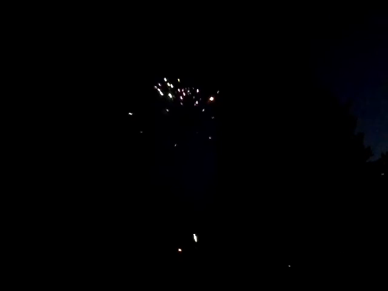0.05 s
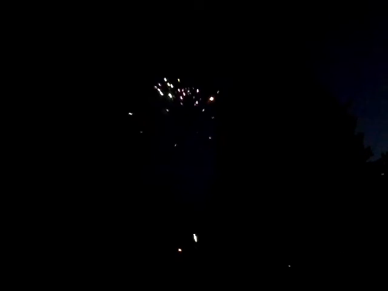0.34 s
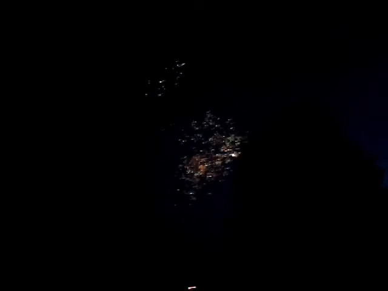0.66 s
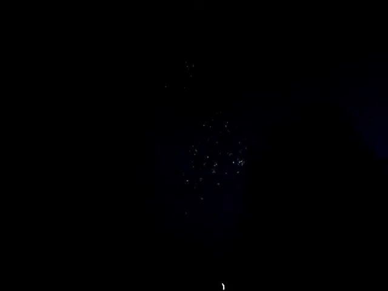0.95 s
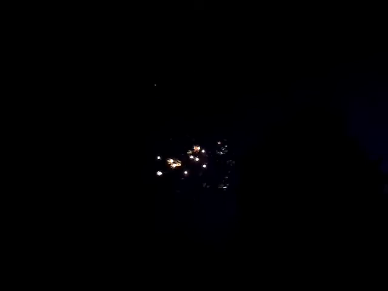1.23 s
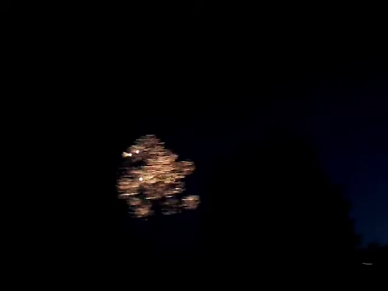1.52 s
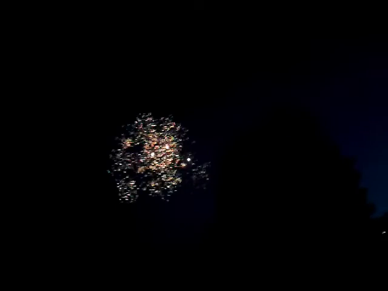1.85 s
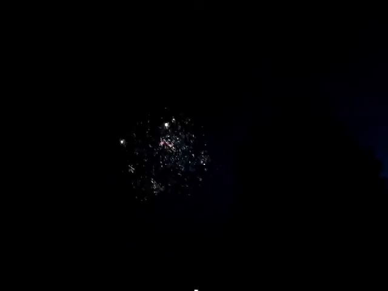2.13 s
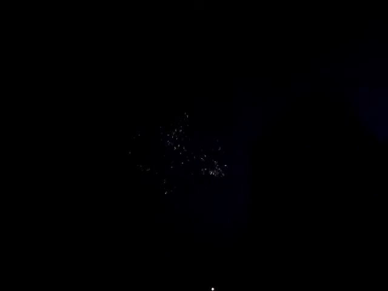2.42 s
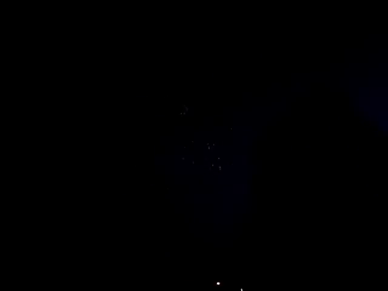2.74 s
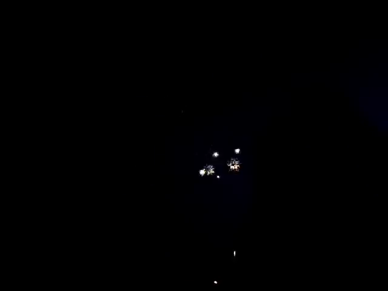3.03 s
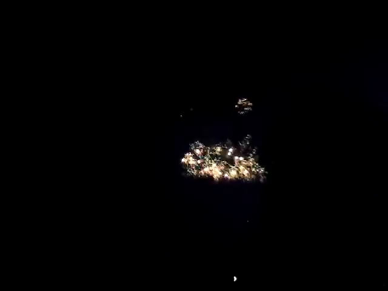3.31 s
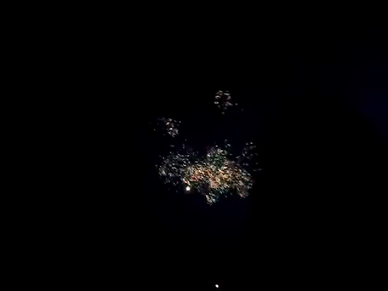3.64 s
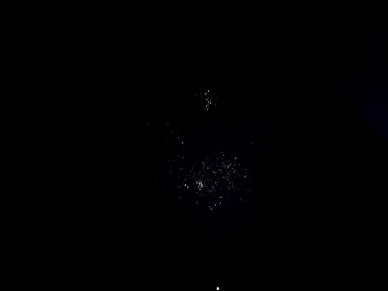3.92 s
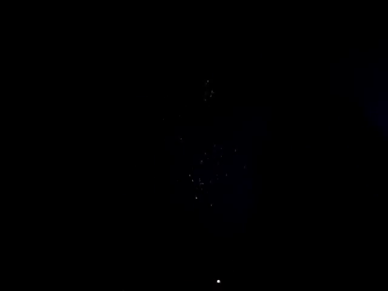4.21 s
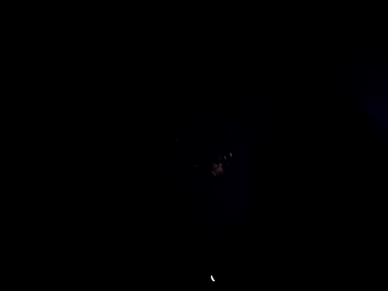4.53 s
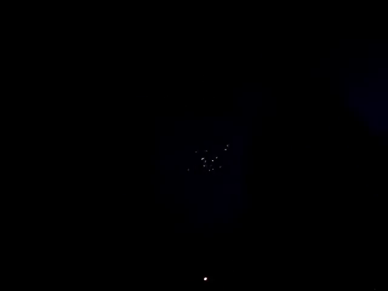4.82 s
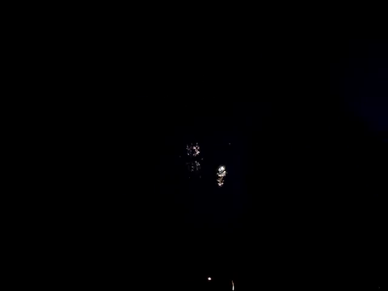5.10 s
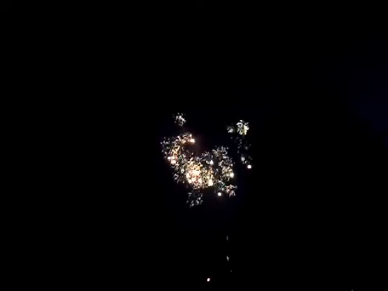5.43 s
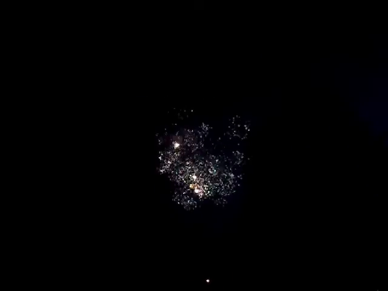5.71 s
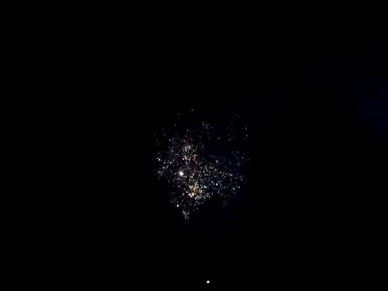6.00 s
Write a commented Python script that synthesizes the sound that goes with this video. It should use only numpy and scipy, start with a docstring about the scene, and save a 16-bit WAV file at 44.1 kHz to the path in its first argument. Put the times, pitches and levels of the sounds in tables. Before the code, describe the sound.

Three aerial fireworks bang and echo outdoors at night, amid swelling clouds of crackling sparks, sharp pops and dull launch thumps.

```python
"""Three firework shells bang outdoors at night, over mortar thumps and clouds of crackling stars.
Each report is a short pressure wave. The shells overload the microphone, bounce off the ground,
slap back from the surroundings and roll away. Stars burn as swelling, fading clouds of tiny blasts,
with louder single pops on top. Low rumble and faint hiss lie underneath, a few close knocks open
the scene, and the sound cuts out twice, with two thin clicks."""
import sys
import numpy as np
from scipy import signal
from scipy.fft import rfft
from scipy.io import wavfile
from scipy.ndimage import uniform_filter1d

SR = 44100
rng = np.random.default_rng(int(sys.argv[2]) if len(sys.argv) > 2 else 0)


def wav_out(sig):
    """Save sig, one row per channel (or a flat mono array), as 16-bit PCM at SR to the path in sys.argv[1]."""
    wavfile.write(sys.argv[1], SR, np.round(np.clip(np.atleast_2d(sig).T, -1, 1) * 32767).astype(np.int16))


N = 271435
TIME = np.arange(N) / SR

# shell bursts: start_s, drive_db (before overload), pitch_hz, crack_db (relative to the blast),
# slap_gain_db, slap_pitch_ratio
SHELLS = [(0.9934, 8, 655, -8, 4, 0.84), (2.7075, 3.5, 583, -25.5, -1.5, 0.55),
          (4.8998, 3, 630, -14.5, 6, 0.93)]
# gaps where the sound cuts out: start_s, end_s
GAPS = [(.3755, .736), (2.7555, 2.8725)]


def amp(db):
    """Decibels to gain."""
    return 10 ** (np.asarray(db) / 20)


def unit_rms(x):
    """Scales to rms 1."""
    return x / np.sqrt(np.mean(x ** 2) + 1e-20)


def levelled(x, size):
    """Rides the gain to a running rms of 1 over size samples."""
    power = uniform_filter1d(uniform_filter1d(x ** 2, size), size)
    return x / np.sqrt(abs(power) + 1e-20)


def curve_at(points, hz):
    """Reads a curve on a log-frequency axis."""
    point_hz, value = np.transpose(points)
    return np.interp(np.log(hz + 1), np.log(point_hz + 1), value)


def add(mix, start_s, sound):
    """Mixes a sound in at a time."""
    part = mix[max(round(start_s * SR), 0):][:len(sound)]
    part += sound[:len(part)]


def lowpass(x, hz, order):
    """Causal low-pass."""
    return signal.sosfilt(signal.butter(order, min(hz, .45 * SR), fs=SR, output="sos"), x)


def ring(x, hz, damping):
    """A heavily damped resonance of gain 1."""
    w = 2 * np.tan(np.pi * min(hz, .4 * SR) / SR)
    return signal.lfilter(*signal.bilinear([2 * damping * w, 0], [1, 2 * damping * w, w * w]), x)


def blast(hz, edge_hz, damping, order, size=4096):
    """A pressure wave of peak 1: one push and its rebound, rounded off by the air."""
    wave = lowpass(ring(signal.unit_impulse(size), hz, damping), edge_hz, order)
    return -wave / abs(wave).max()


def scatter(hz, edge_hz, decay_s, damping, order, size=4096):
    """A dying spray of small reflections."""
    spray = unit_rms(lowpass(ring(rng.standard_normal(size), hz, damping), edge_hz, order))
    return spray * np.exp(-np.arange(size) / SR / decay_s)


def thud(hz, edge_hz):
    """One or two slow swings of pressure, with the sub-bass trimmed."""
    wave = blast(hz, edge_hz, damping=.36, order=4)
    return wave - lowpass(wave, .15 * hz, order=1)


def background_noise():
    """Low rumble and faint hiss that sink after each bang and swell back."""
    # level rides of the bed: time_s, rumble_db, hiss_db
    bed_levels = [(0, -44, -67.5), (.3, -57, -64.5), (.74, -68.5, -75), (.95, -44, -71), (1.6, -47.5, -68),
                  (2.65, -52, -66.5), (2.9, -56, -76.5), (3.4, -53.5, -80.5), (3.7, -54, -76),
                  (3.95, -44.5, -65.5), (4.5, -46, -64), (4.87, -50, -63), (4.92, -46, -70),
                  (5.3, -59.5, -80), (5.7, -48.5, -76), (6.15, -47, -65.5)]
    # tone of the rumble: frequency_hz, gain_db
    rumble_eq = [(20, -26), (50, -7), (130, 1.5), (200, -3), (300, -3), (600, -11), (1000, -23),
                 (2500, -32), (8000, -81)]
    time_s, *levels = np.transpose(bed_levels)
    rumble_db, hiss_db = (np.interp(TIME, time_s, level) for level in levels)
    tone = amp(curve_at(rumble_eq, np.fft.rfftfreq(N, 1 / SR)))
    rumble = np.fft.irfft(rfft(rng.standard_normal(N)) * tone, N)
    return amp(rumble_db) * unit_rms(rumble) + amp(hiss_db) * rng.standard_normal(N)


def open_air(x, size=65536):
    """A long rolling echo that starts after a short gap and loses its treble first."""
    # decay of the echo: frequency_hz, t60_s
    echo_decay = [(100, 1.0), (600, 1.52), (1500, 1.46), (4000, 0.7), (9000, 0.5)]
    # tone of the echo: frequency_hz, gain_db
    echo_eq = [(40, -6.5), (130, 4.5), (330, -7), (1200, -5.5), (3500, -6.5), (4800, 2.5), (7000, -1),
               (12000, -20)]
    hz, t, spectrum = signal.stft(rng.standard_normal(size), SR, nperseg=256)
    gain_db = curve_at(echo_eq, hz)[:, None] - 60 * t / curve_at(echo_decay, hz)[:, None]
    tail = signal.istft(spectrum * amp(gain_db), SR, nperseg=256)[1][:size]
    tail *= np.clip((np.arange(size) / SR - .016) / .004, 0, 1)  # 16 ms pre-delay
    return signal.fftconvolve(x, tail / np.linalg.norm(tail))[:N]


def mortar_thumps(slap_s=.025, slap_db=-4.5):
    """Lift charges thump, each with one slap from nearby."""
    # mortars firing: start_s, peak_db
    launches = [(1.268, -17.5), (3.2566, -29.5), (5.6093, -26.5), (5.6488, -24)]
    out, lift = np.zeros(N), thud(hz=210, edge_hz=315)
    for start_s, peak_db in launches:
        add(out, start_s, amp(peak_db) * lift)
        add(out, start_s + slap_s, amp(peak_db + slap_db) * lift)
    return out


def close_knocks():
    """Deep, dry knocks close by, each a single thud."""
    # knocks: start_s, peak_db, pitch_hz, edge_hz
    knock_hits = [(0.1041, -13.5, 90, 190), (0.2815, -17.5, 90, 800), (0.2864, -11, 228, 700),
                  (0.288, -18, 228, 5000), (0.295, -27.5, 40, 123)]
    out = np.zeros(N)
    for start_s, peak_db, pitch_hz, edge_hz in knock_hits:
        add(out, start_s, amp(peak_db) * thud(pitch_hz, edge_hz))
    return out


def cloud_mix(t, swell_power=1.38):
    """Star clouds swell, hold and fade. Gives their joint level_db, presence_db, treble_db, snap_share."""
    # clouds of crackling stars: start_s, level_db, swell_s, hold_s, fade_db_per_s, presence_db,
    # treble_db, snap_share (0 all sizzle, 1 all separate snaps)
    star_clouds = [(0.723, -31.5, 0.085, 0.31, 19, 0.5, -6, 0.5), (1.302, -38, 0.28, 0.049, 44.5, 0, 0, .2),
                   (1.656, -27.5, 0.025, 0.085, 37, -4.5, -0.5, .75),
                   (1.979, -21, 0.028, 0.12, 54.5, 1, -2.5, 0.7), (2.293, -37, 0.11, 0.11, 33, 0, -22, .4),
                   (3.474, -45.5, 0.055, 0.11, 39, -19, -19, 0.75),
                   (3.685, -15, .24, 0.026, 54, -7.5, -19, 0.69),
                   (4.14, -34.5, 0.53, 0.11, 76, -2, -19.5, 0.1),
                   (4.899, -37, 0.072, 0.06, 41.5, 1, -9, 0.3),
                   (5.547, -40.5, 0.071, 0.21, 37, 2, -13, 0.7),
                   (5.741, -20.5, 0.2, 0.21, 24, 5.5, -13, .75)]
    start_s, level_db, swell_s, hold_s, fade_db_per_s, *traits = np.transpose(star_clouds)[:, :, None]
    age_s = t - start_s
    swell = np.clip(age_s / swell_s, 0, 1) ** swell_power  # speeds up as more stars catch
    fade_db = fade_db_per_s * np.maximum(age_s - swell_s - hold_s, 0)
    power = (swell * amp(level_db - fade_db)) ** 2 + 1e-14
    total = power.sum(0)
    return [10 * np.log10(total)] + [(power * trait).sum(0) / total for trait in traits]


def sparks(per_s, spread_db, bands=14):
    """Random tiny blasts of many widths, each followed by its bounce off the ground."""
    out = np.zeros(N)
    for hz in np.geomspace(330, 5200, bands):
        strength = amp(spread_db * np.minimum(rng.exponential(1, N), 2))
        clicks = strength * (rng.random(N) < per_s / bands / SR)
        lag = np.round(rng.uniform(.0028, .0052, N) * SR).astype(int)
        bounces = np.bincount(np.arange(N) + lag, clicks)[:N]
        out -= ring(clicks + .89 * bounces, hz, damping=.45)
    return lowpass(out, 4660, order=6)


def star_crackle():
    """Clumps of separate snaps over a dense sizzle; some clouds sound bright, others dull."""
    # tone of the crackle: frequency_hz, gain_db
    crackle_eq = [(30, -33), (120, -3), (230, 8), (400, -8), (620, 3), (1200, -0.5), (2300, -0.5),
                  (4000, 11), (5200, 8.5), (7000, 12), (10000, 17.5), (16000, -17)]
    # reach of a cloud's presence setting: frequency_hz, weight
    presence_band = [(1000, 0), (1600, .35), (2400, 1), (3000, .75), (4200, 0)]
    # reach of a cloud's treble setting: frequency_hz, weight
    treble_band = [(2400, 0.016), (3000, 0.67), (4200, 1.42), (6000, 1.39), (10000, 0.64)]
    coarse = TIME[::64]
    level_db, _, _, snap_share = (np.interp(TIME, coarse, curve) for curve in cloud_mix(coarse))
    snap_share = np.clip(snap_share, 0, 1)
    clumps = np.clip(unit_rms(uniform_filter1d(rng.standard_normal(N), size=250)), -2, 2)
    crowd = amp(.5 * (level_db + 30.5) + 4.5 * clumps)  # louder clouds hold more stars, in bunches
    snaps = levelled(sparks(per_s=520 * crowd, spread_db=10.5), size=1200)
    sizzle = levelled(sparks(per_s=12000, spread_db=.5), size=1200)
    blend = np.sqrt(snap_share) * snaps + np.sqrt(1 - snap_share) * sizzle
    hz, t, spectrum = signal.stft(blend, SR, nperseg=256, noverlap=192)
    _, presence_db, treble_db, _ = cloud_mix(t)
    hz = hz[:, None]
    brightness_db = curve_at(presence_band, hz) * presence_db + curve_at(treble_band, hz) * treble_db
    spectrum *= amp(curve_at(crackle_eq, hz) + brightness_db)
    return signal.istft(spectrum, SR, nperseg=256, noverlap=192)[1][:N] * amp(level_db - 2)


def stray_stars(max_per_s=22, over_cloud_db=11, cap_db=-15, spread_db=.5, count=200):
    """Lesser stars pop at random, most often in snappy clouds. Gives rows like those of the loud stars."""
    when, chance, size, bounce = rng.random((count, 4)).T
    start_s = when * N / SR
    cloud_db, _, _, snap_share = cloud_mix(start_s)
    level_db = np.minimum(cloud_db + over_cloud_db, cap_db)  # a lesser star has only so much powder
    level_db += spread_db * (2 * size - 1)
    fires = chance < snap_share * max_per_s * N / SR / count
    return np.transpose([start_s, level_db, .0028 + .0022 * bounce])[fires]


def star_pops(reference_hz=2660, treble_db_per_octave=28):
    """Single stars: a snap, its ground bounce, a weak slap from nearby and some scatter."""
    # the loudest single stars: time_s, level_db, bounce_delay_s
    loud_stars = [(.7646, -21.5, 0.0056), (.877, -17, 0.0018), (.9722, -14, 0.0057), (1.0623, -5, 0.0048),
                  (1.4555, -10.5, .0034), (1.536, -13, 0.0055), (1.6674, -13.5, 0.0033),
                  (1.6834, -15, 0.0038), (1.7214, -10, 0.0046), (1.7641, -13, 0.0038),
                  (1.7831, -9.5, 0.0028), (1.8514, -14.5, 0.0037), (1.9013, -11.5, 0.0034),
                  (1.9341, -6.5, 0.0069), (1.9839, -8.5, 0.0031), (2.0041, -11, .0051),
                  (2.0413, -9.5, 0.0036), (2.0755, -9, 0.0038), (2.1188, -8.5, 0.004), (2.145, -4, 0.0036),
                  (2.2497, -8.5, 0.0022), (2.273, -9.5, .0043), (2.2949, -8.5, 0.0025),
                  (2.3672, -12, 0.0036), (2.4068, -9, 0.0065), (2.51, -13, .0043), (2.5699, -13, 0.0043),
                  (2.8925, -15.5, 0.004), (3.1512, -28, 0.0045), (3.5329, -33, 0.0023),
                  (3.6162, -38, .0039), (3.9946, -12, 0.0031), (4.0152, -12, 0.0038), (4.0499, -10, 0.0028),
                  (4.0737, -8.5, .0029), (4.0889, -11, 0.0036), (4.1218, -7, .0034), (4.1888, -15, 0.0018),
                  (4.2961, -12.5, 0.0041), (4.4315, -14, .003), (4.862, -26, 0.0031), (5.4824, -36, 0.003),
                  (5.5165, -26.5, 0.0043), (5.785, -15.5, 0.0041), (5.8549, -10.5, 0.0035),
                  (5.8833, -9.5, .0028), (5.9105, -17, 0.0053), (5.9856, -11, 0.0032),
                  (6.0763, -12, 0.0056)]
    out, stars = np.zeros(N), np.vstack([loud_stars, stray_stars()])
    _, _, treble_db, _ = cloud_mix(stars[:, 0])
    pitches = reference_hz * 2 ** (treble_db / treble_db_per_octave)  # duller clouds pop lower
    for (time_s, level_db, bounce_delay_s), hz in zip(stars, pitches):
        snap = amp(level_db + 2) * blast(.75 * hz, 2.1 * hz, damping=.7, order=5)
        spray = scatter(.31 * hz, 2.24 * hz, decay_s=.0056, damping=.8, order=5)
        start_s = time_s - .0002
        add(out, start_s, snap)
        add(out, start_s + bounce_delay_s, .76 * snap)
        add(out, start_s + .0203, .28 * snap)  # slap
        add(out, start_s, amp(level_db - 10) * spray)
    return out


def shell_slaps():
    """Slapback of the bangs: a softened blast from each reflector, smeared by foliage."""
    # reflecting surroundings: delay_s, level_db, base_pitch_hz, scatter_db (relative to the slap)
    reflectors = [(0.0201, -11, 532, -19.5), (0.0334, -16, 1008, -13), (0.0692, -25.5, 875, -4),
                  (0.0756, -25.5, 700, -0.5), (.125, -20, 480, -18), (.132, -22.5, 640, -12.5),
                  (.194, -25.5, 836, -21)]
    out = np.zeros(N)
    for start_s, *_, gain_db, pitch_ratio in SHELLS:
        for delay_s, level_db, base_hz, scatter_db in reflectors:
            spray = scatter(pitch_ratio * base_hz, 4400, decay_s=.015, damping=.73, order=3)
            slap = blast(pitch_ratio * base_hz, 3500, damping=.27, order=2)
            add(out, start_s + delay_s, amp(gain_db + level_db) * (slap + amp(scatter_db) * spray))
    return out


def stall_echoes(x, stall_s=.097):
    """The second gap holds up the echoes of the second shell: they resume late."""
    held = (TIME > GAPS[1][0]) & (TIME < SHELLS[2][0] - stall_s)
    return np.where(held, np.roll(x, round(stall_s * SR)), x)


def overload(x, ceiling):
    """The microphone flattens peaks that pass its ceiling, with a hard knee."""
    return x / (1 + (x / ceiling) ** 16) ** (1 / 16)


def shell_bangs():
    """Each shell: a broad blast with a ragged crack in front, doubled by the ground, scattered nearby."""
    out = np.zeros(N)
    for start_s, drive_db, pitch_hz, crack_db, *_ in SHELLS:
        crack = scatter(3600, 5500, decay_s=.0016, damping=.35, order=2)
        wave = amp(drive_db) * (blast(pitch_hz, 1400, damping=.5, order=2) + amp(crack_db) * crack)
        wave += amp(drive_db - 17.5) * blast(290, 800, damping=.47, order=2)  # low body
        rumble = scatter(480, 3000, decay_s=.06, damping=.6, order=3, size=16384)
        add(out, start_s, wave)
        add(out, start_s + .0033, .58 * wave)  # ground bounce
        add(out, start_s, amp(drive_db - 27) * rumble)
    out = overload(out, ceiling=.6)  # only the shells overload the microphone
    return out - lowpass(out, 55, order=1)


def scene():
    """Shells, thumps and pops feed the open-air echo, over a bed of crackle, rumble and hiss."""
    shells = shell_bangs()
    thumps = mortar_thumps() + close_knocks()
    bed = star_crackle() + background_noise()
    bursts = stall_echoes(shells + shell_slaps() + open_air(amp(-17.5) * shells))
    pops = star_pops()
    echo = open_air(amp(-13.5) * pops + amp(-29.5) * thumps)
    return (bursts + pops + thumps + echo + bed)[None]


def record(dry, top_hz=16000):
    """The sound cuts out twice and clicks, and the very top of the treble is cut off."""
    # thin clicks near the gaps: start_s, peak_db
    gap_clicks = [(.3752, -19.5), (2.905, -21.5)]
    live = TIME < TIME[-40]  # quick fade at the very end
    for start_s, end_s in GAPS:
        live &= (TIME < start_s) | (TIME > end_s)
    out = dry[0] * uniform_filter1d(1. * live, size=40)
    for start_s, peak_db in gap_clicks:
        add(out, start_s, amp(peak_db) * blast(1433, 21000, damping=.63, order=1))
    high_cut = signal.firwin(255, top_hz, window=("kaiser", 8), fs=SR)
    return signal.oaconvolve(out, high_cut, "same")[None]


dry = scene()
out = record(dry)
wav_out(out)
```